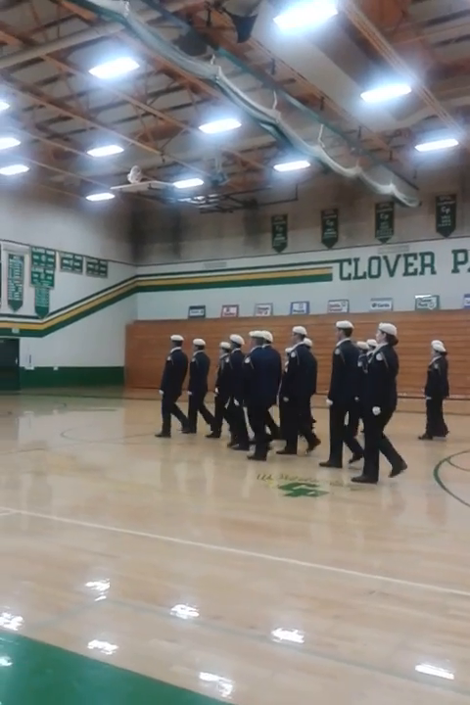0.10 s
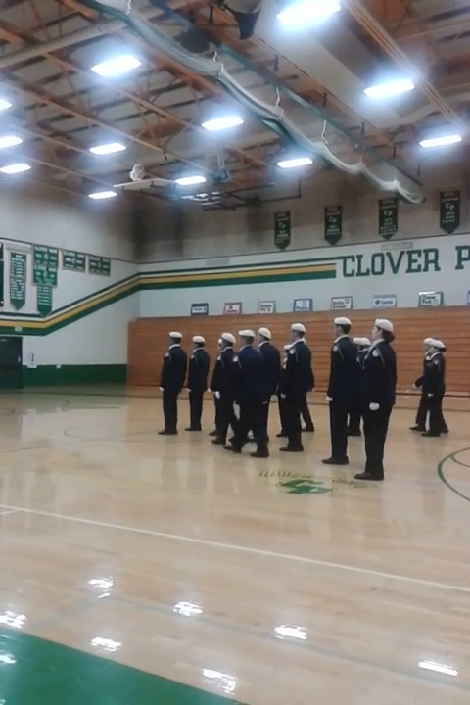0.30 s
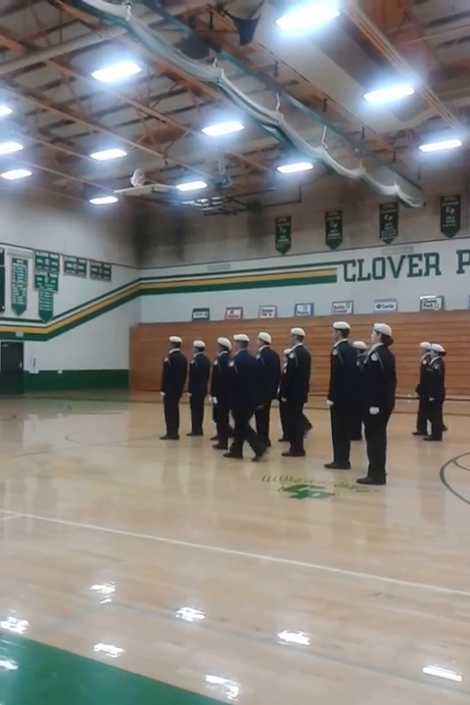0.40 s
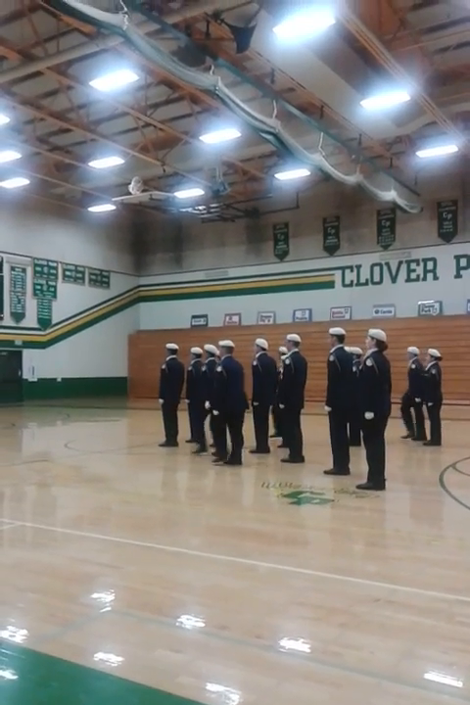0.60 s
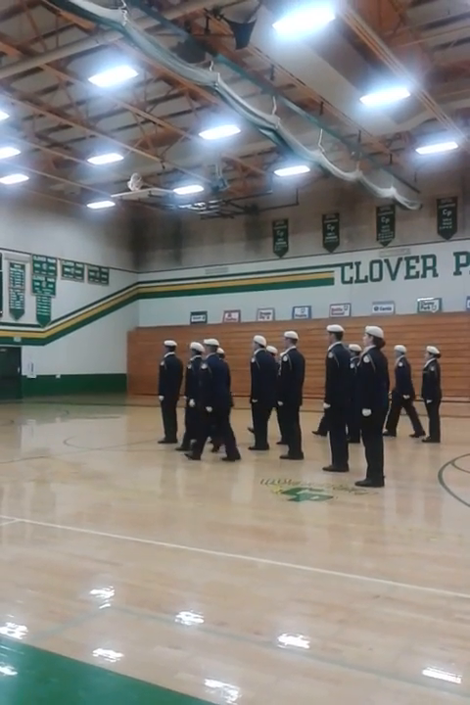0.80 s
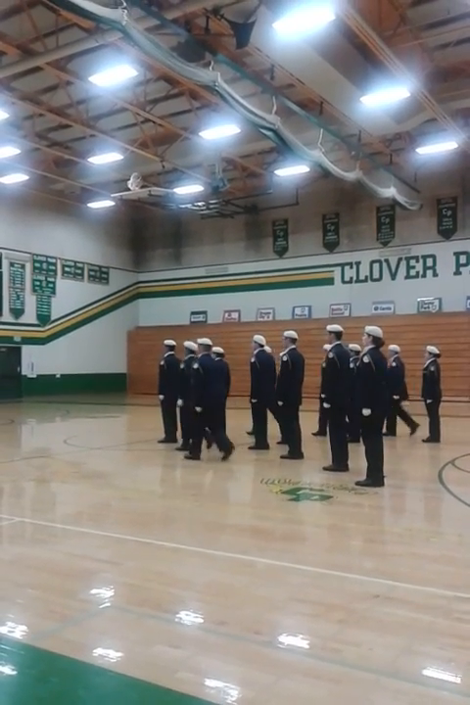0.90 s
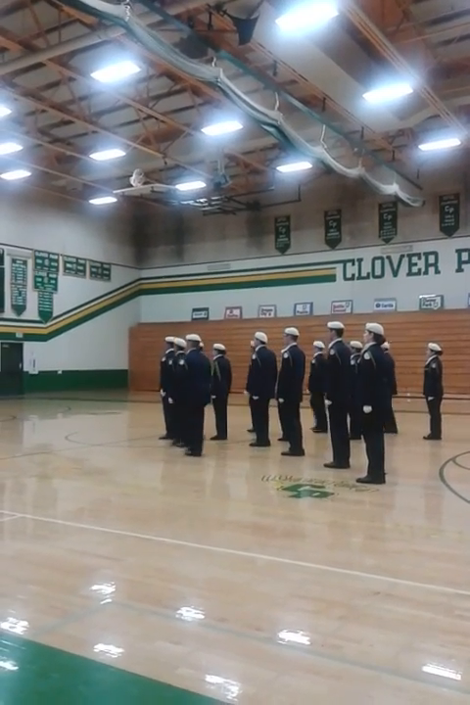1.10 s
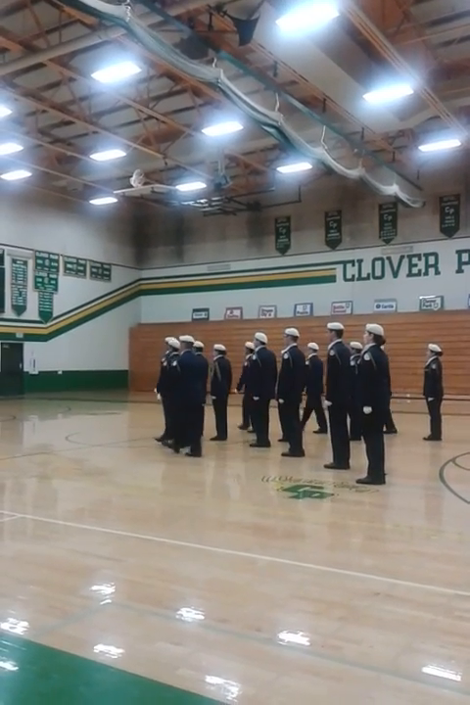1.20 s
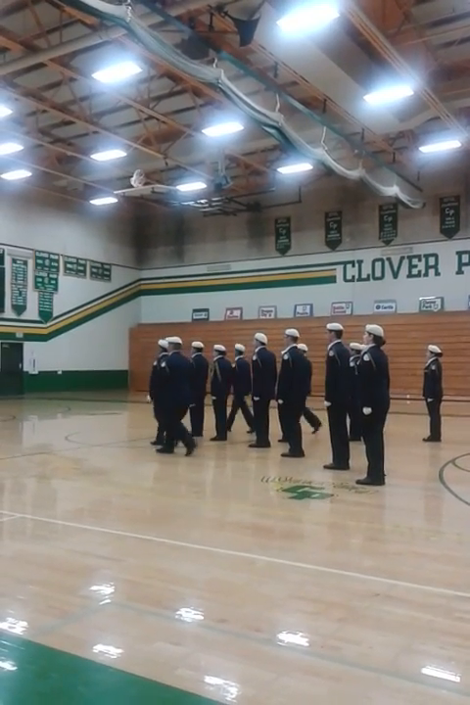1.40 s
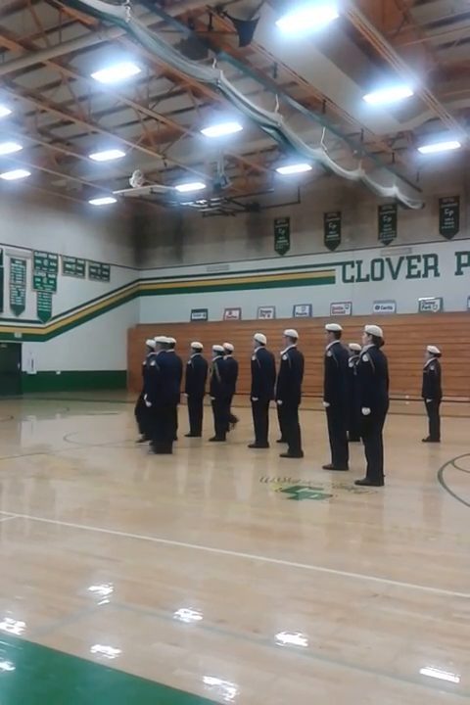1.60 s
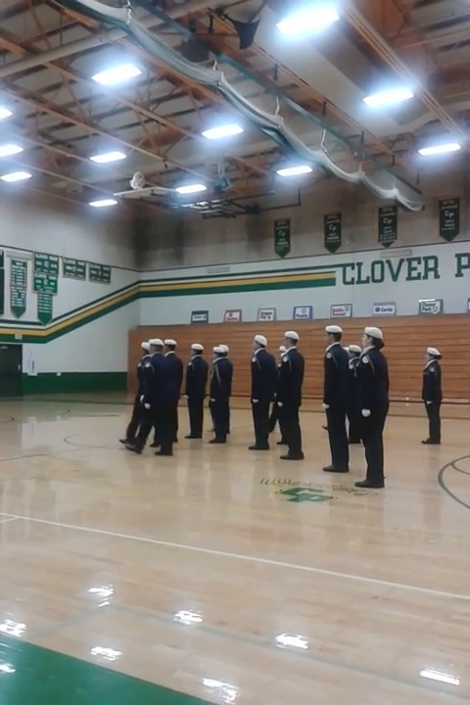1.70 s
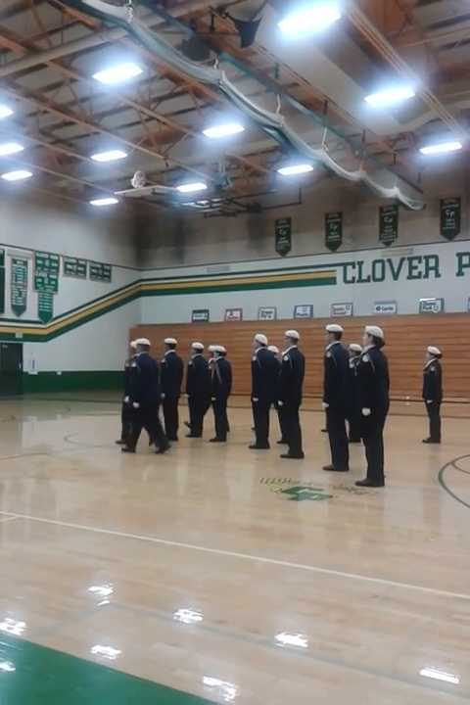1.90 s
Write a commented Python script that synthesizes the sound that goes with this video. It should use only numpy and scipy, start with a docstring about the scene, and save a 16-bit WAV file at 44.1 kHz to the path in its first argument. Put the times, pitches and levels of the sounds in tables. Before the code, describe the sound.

A marching group halts with one loud stamp on a wooden gym floor, briefly overloading the microphone. The large hall rings for over a second, while a few marchers walk on with soft steps and faint shoe squeaks.

```python
"""In a gym with a sprung wooden floor, a drill team halts with one loud stamp, landing within about 90 ms.
Each impact excites the modes of a heel, a broadband slap of the sole and a damped thump of the boards,
and the hall reverberates for well over a second. A few marchers keep walking softly, with heel taps
and the friction noise of brushing, squeaking soles. The stamp overloads the microphone."""
import sys
import numpy as np
from scipy import signal
from scipy.fft import rfft, irfft
from scipy.io import wavfile
from scipy.ndimage import uniform_filter1d

SR = 44100
rng = np.random.default_rng(int(sys.argv[2]) if len(sys.argv) > 2 else 0)


def to_wav(s):
    """Save 16-bit WAV."""
    ch = np.atleast_2d(s).T  # columns
    pcm = np.round(np.clip(ch, -1, 1) * 32767)  # PCM
    wavfile.write(sys.argv[1], SR, pcm.astype(np.int16))


N = 88200
LEAD = int(.25 * SR)  # samples before time zero, also the length of one contact sound
SIZE = N + LEAD
AGE_S = np.arange(SIZE) / SR
CONTACT_S = AGE_S[:LEAD]


def amp(db):
    """Amplitude ratio of a level in decibels."""
    return 10 ** (np.asarray(db) / 20)


def on_log(hz, points):
    """Interpolation of (frequency_hz, value) points on a logarithmic frequency axis."""
    f, v = np.array(points, float).T
    return np.interp(np.log(np.maximum(hz, 1)), np.log(f), v)


def colour(x, spectrum):
    """Minimum-phase filtering to a spectral shape, conserving the power of white noise."""
    cepstrum = irfft(np.log(amp(on_log(np.fft.rfftfreq(4096, 1 / SR), spectrum))))
    cepstrum[1:2048] *= 2
    cepstrum[2049:] = 0
    response = irfft(np.exp(rfft(cepstrum)))
    return signal.fftconvolve(x, response / np.linalg.norm(response))[:len(x)]


def decay(t, t60_s):
    """Exponential damping, 60 dB down after t60_s."""
    return np.exp(-np.log(1000) * t / t60_s)


def add(track, start_s, sound):
    """Linear superposition of a sound on a track."""
    i = max(int(start_s * SR) + LEAD, 0)
    track[i:i + len(sound)] += sound[:max(SIZE - i, 0)]


def burst(spectrum, t60_s):
    """Impact noise: a broadband transient that decays exponentially."""
    return colour(rng.standard_normal(LEAD) * decay(CONTACT_S, t60_s), spectrum)


def ring(modes, spread=.035):
    """Free vibration: a sum of damped modes, each randomly detuned."""
    detunings = 1 + spread * rng.standard_normal(len(modes))
    return sum(amp(db) * decay(CONTACT_S, t60_s) * np.sin(2 * np.pi * hz * detune * CONTACT_S)
               for (hz, db, t60_s), detune in zip(modes, detunings))


# Spectrum of room air and microphone hiss: frequency_hz, relative_db
AIR_SPECTRUM = [(25, -17), (70, -8.5), (130, 1), (260, -1.5), (500, -10), (1300, -16), (2000, -17.5),
                (3600, -22.5), (6000, -29), (8500, -25.5), (14500, -32.5)]
def air(level_db=-51):
    """Stationary noise: the air of the hall and the hiss of the microphone."""
    return amp(level_db) * colour(rng.standard_normal(SIZE), AIR_SPECTRUM)


# Reverberation time by band: frequency_hz, t60_s
REVERB_TIMES = [(60, 3.5), (115, 2.8), (250, 1.5), (500, 1.76), (900, 1.76), (2000, 1.6), (3800, 1.5),
                (5500, 1.2), (8500, .76), (11500, .1)]
# Spectrum of the diffuse field: frequency_hz, relative_db
REVERB_SPECTRUM = [(40, -15), (75, -6.5), (115, 2.5), (165, 1), (250, -1.8), (400, .3), (520, -1), (800, 0),
                   (1300, -3), (1900, .5), (2900, -.5), (3700, -4), (4400, -4.5), (5200, -1), (7000, 1.5),
                   (8500, 1.5), (10000, -6), (13000, -15)]
# Distinct wall reflections: delay_s, relative_db
WALL_ECHOES = [(.103, -11.5), (.130, -15)]
def hall(x, wet_db):
    """Reverberation: direct sound, two wall echoes and a diffuse tail whose treble is absorbed first."""
    grains = rng.standard_normal(SIZE)
    grains *= np.exp(.428 * np.repeat(rng.standard_normal(SIZE // 32 + 1), 32)[:SIZE])  # uneven strength
    hz = np.fft.rfftfreq(SIZE, 1 / SR)
    spectrum = rfft(grains / grains.std()) * amp(on_log(hz, REVERB_SPECTRUM))
    centres_hz, t60s = np.array(REVERB_TIMES).T
    tail = np.zeros(SIZE)
    for band, t60_s in zip(np.eye(len(centres_hz)), t60s):
        weight = np.interp(np.log(hz + 1), np.log(centres_hz), band)
        tail += irfft(spectrum * weight, SIZE) * decay(AGE_S, t60_s)
    predelay_s, build_s = .01294, .0328
    build = np.clip((AGE_S - predelay_s) / build_s, 0, 1)
    tail *= build / np.linalg.norm(build * decay(AGE_S, np.median(t60s)))
    walls = np.zeros(LEAD)
    for delay_s, relative_db in WALL_ECHOES:
        walls[int(delay_s * SR)] += amp(relative_db)
    tail[:LEAD] += signal.sosfilt(signal.butter(1, 2200, fs=SR, output="sos"), walls + 1e-18)
    response = amp(wet_db) * tail
    response[0] += 1  # direct path
    return signal.fftconvolve(x, response)[:SIZE]


# Soles brushing the floor: start_s, length_s, level_db
SOLE_BRUSHES = [(-.1, .32, -44.5), (.88, .28, -51), (1.237, 0.122, -51), (1.372, 0.0706, -47),
                (1.42, .21, -47.5), (1.752, .022, -51), (1.881, 0.174, -48.5)]
# Spectrum of the brushing: frequency_hz, relative_db
BRUSH_SPECTRUM = [(150, -11), (450, 5), (800, -0.5), (1300, -2), (2000, -3), (3000, -8.5), (4000, -10.5),
                  (5500, -21), (8500, -19), (15000, -29.5)]
def shuffles():
    """Sliding friction: soles on varnish make noise that swells quickly and eases off."""
    envelope = np.zeros(SIZE)
    for start_s, length_s, level_db in SOLE_BRUSHES:
        progress = np.linspace(0, 1, int(length_s * SR))
        add(envelope, start_s, amp(level_db) * np.sin(np.pi * np.sqrt(progress)))
    return envelope * colour(rng.standard_normal(SIZE), BRUSH_SPECTRUM)


# Rubber squeaks: start_s, length_s, pitch_hz, level_db
SOLE_SQUEAKS = [(.486, .02, 3750, -32), (1.14, .03, 3900, -56), (1.181, .044, 3930, -52.5),
                (1.415, .05, 4200, -56), (1.545, .04, 3900, -54.5)]
def squeaks(sag=.17, roughness=.04):
    """Frictional oscillation: a pivoting sole sings briefly and sags in pitch as it stops."""
    out = np.zeros(SIZE)
    for start_s, length_s, pitch_hz, level_db in SOLE_SQUEAKS:
        progress = np.linspace(0, 1, int(length_s * SR))
        wobble = uniform_filter1d(rng.standard_normal(LEAD), size=25)[:len(progress)] * np.sqrt(25)
        glide_hz = pitch_hz * (1 - sag * progress ** 4 + roughness * wobble)
        tone = np.sin(2 * np.pi * np.cumsum(glide_hz) / SR)
        add(out, start_s, amp(level_db) * np.sin(np.pi * progress) * tone)
    return out


# Spectra of the bright click and the dull knock: frequency_hz, relative_db
CLICK_SPECTRUM = [(300, -10), (1200, 0.5), (2300, -1.5), (4000, -1.5), (5800, -10.5), (8200, -6),
                  (12000, -14.5), (15000, -20.5)]
KNOCK_SPECTRUM = [(120, -14.5), (400, 2), (700, 0.5), (1350, -1), (1800, -8), (3000, -19), (6000, -33),
                  (15000, -46.5)]
# Woody modes of a tap: pitch_hz, relative_db, t60_s
WOODY_MODES = [(1080, -1, .035), (4200, -4, .018)]
# Light heel taps: start_s, click_db, knock_db
HEEL_TAPS = [(1.372, -58, -39.5), (1.505, -48.5, -43), (1.593, -56, -34.5), (1.623, -58, -43),
             (1.661, -57.5, -35.5), (1.7975, -56, -33), (1.8005, -38, -31), (1.811, -48, -41.5),
             (1.819, -60, -39)]
def taps():
    """Light impact: heels touch down or meet with a dull knock and a short, resonant click."""
    out = np.zeros(SIZE)
    for start_s, click_db, knock_db in HEEL_TAPS:
        click = burst(CLICK_SPECTRUM, t60_s=.0483) + ring(WOODY_MODES)
        knock = burst(KNOCK_SPECTRUM, t60_s=.03144)
        add(out, start_s, amp(click_db) * click + amp(knock_db) * knock)
    return out


def boards(pitch_hz, rise_s):
    """Damped resonance: the sprung floor swells and dies within a few cycles under a foot."""
    envelope = CONTACT_S / rise_s * np.exp(1 - CONTACT_S / rise_s)
    thump = envelope * np.sin(2 * np.pi * pitch_hz * CONTACT_S)
    return signal.sosfilt(signal.butter(2, 120, btype="high", fs=SR, output="sos"), thump)


# Spectrum of a sole meeting the floor: frequency_hz, relative_db
SOLE_SPECTRUM = [(40, -42), (100, -25), (300, -6), (480, -5.5), (780, 1.5), (1200, -3.5), (2000, -7.5),
                 (3000, -16.5), (3800, -18), (5500, -33), (10000, -37), (15000, -62)]
def sole(t60_s):
    """Contact noise: a flat sole slaps or scuffs, mostly in the midrange."""
    return burst(SOLE_SPECTRUM, t60_s)


# Spectrum of the rumbling boards: frequency_hz, relative_db
RUMBLE_SPECTRUM = [(60, -40), (160, -12), (240, 0), (310, -.5), (400, -13), (900, -42), (3000, -70)]
# Soft footfalls: start_s, thud_db, rumble_db, pitch_hz
SOFT_STEPS = [(-.12, -27, -39, 259.6), (-.015, -26, -36.5, 268.9), (.865, -25, -36, 270.6),
              (1.0, -31, -42, 300), (1.254, -30.5, -39, 260.8), (1.295, -32, -40, 297.1),
              (1.325, -36, -41, 280), (1.374, -24.5, -36, 253.2), (1.405, -29, -39, 260),
              (1.453, -26.5, -39, 239.7), (1.472, -29, -44, 280), (1.499, -28, -46, 247.3),
              (1.592, -38, -50, 310), (1.659, -42, -56, 270), (1.8204, -24.5, -46, 290.5),
              (1.852, -34.5, -47, 306), (1.886, -37, -47, 275), (1.912, -35, -45, 270.8),
              (1.965, -36, -45, 262)]
def steps(scuff_db=-18):
    """Structure-borne sound: a soft step thuds and scuffs, and the boards rumble on briefly."""
    out = np.zeros(SIZE)
    for start_s, thud_db, rumble_db, pitch_hz in SOFT_STEPS:
        thud = boards(pitch_hz, rise_s=.00366) + amp(scuff_db) * sole(t60_s=.1)
        rumble = burst(RUMBLE_SPECTRUM, t60_s=.22)
        add(out, start_s, amp(thud_db) * thud + amp(rumble_db) * rumble)
    return out


# Modes of a hard heel: pitch_hz, relative_db, t60_s
HARD_HEEL_MODES = [(1301.5, -9.5, .025), (1901, -8, .015), (2865.5, -5.5, .012), (3500, -2.5, .009)]
# Spectrum of its crack: frequency_hz, relative_db
CRACK_SPECTRUM = [(200, -18.5), (1200, -2), (3600, -.5), (4600, -9), (5600, -14), (7000, -14), (8800, -11),
                  (11000, -21), (15000, -42)]
def heel(crack_db=-4, rise_s=.0005):
    """Impulse excitation: a hard heel cracks against the varnish and its modes ring briefly."""
    strike = ring(HARD_HEEL_MODES) + amp(crack_db) * burst(CRACK_SPECTRUM, t60_s=.01203)
    return strike * np.minimum(CONTACT_S / rise_s, 1)


# Spectrum of the tick of a heel's edge: frequency_hz, relative_db
TICK_SPECTRUM = [(1000, -12), (4000, -4), (6000, -7), (8600, 0), (10500, -7), (12500, -21), (14300, -23),
                 (16000, -40)]
# Feet of the halt, with early reflections off the floor and nearby bodies (rows at .2208 and .234): start_s,
# tick_db, heel_db, slap_db, thump_db, pitch_hz
STAMPING_FEET = [(.209, -48, -26, -34, -28.5, 263), (.2178, -4, 2.5, -20, -7, 254.5),
                 (.2208, -30, -11, -13, -20, 300), (.229, -20, -14, -11, -19, 279.4),
                 (.234, -31, -20, -15, -21, 330), (.240, -22, -11, -7, -17, 300),
                 (.2422, -14.5, -11.5, -7, -18, 270), (.2465, -21, -17, -2.5, -3.5, 250),
                 (.2570, -30, -18, -4.5, -8, 318.4), (.2682, -16, -17, -6.5, -12, 215),
                 (.2837, -38, -27, -16, -7, 260.3), (.2915, -40, -28, -15, -4, 225),
                 (.301, -42, -28, -18, -13, 175)]
def stamp(tick_lag_s=.0006):
    """Superposition: many feet land hard, almost together, with early reflections off the floor and nearby
    bodies, each exciting the hall from its own spot."""
    out = np.zeros(SIZE)
    for start_s, tick_db, heel_db, slap_db, thump_db, pitch_hz in STAMPING_FEET:
        tick = np.roll(burst(TICK_SPECTRUM, t60_s=.005), int(tick_lag_s * SR))
        foot = amp(tick_db) * tick + amp(heel_db) * heel()
        foot += amp(slap_db) * sole(t60_s=.0563)
        foot += amp(thump_db) * boards(pitch_hz, rise_s=.003483)
        add(out, start_s, hall(foot, wet_db=0))
    return out


def scene():
    """Sound pressures add: steady air, the stamp and the quieter footwork in the reverberant hall."""
    pressure = air() + stamp()
    pressure += hall(steps() + shuffles(), wet_db=-6)
    pressure += hall(taps() + squeaks(), wet_db=-7.5)
    return pressure[None, LEAD:]


def record(dry):
    """Saturation and band limiting: peaks flatten at full scale and the highest treble is cut."""
    knee, top_hz = 7.1, 14900
    clipped = dry / (1 + abs(dry) ** knee) ** (1 / knee)
    return signal.sosfilt(signal.ellip(8, .2, 70, top_hz, fs=SR, output="sos"), clipped)


dry = scene()
out = record(dry)
to_wav(out)
```